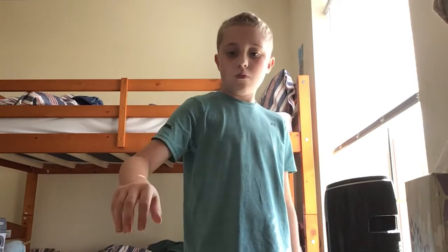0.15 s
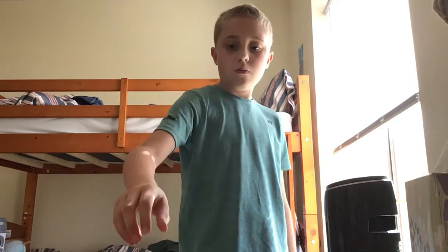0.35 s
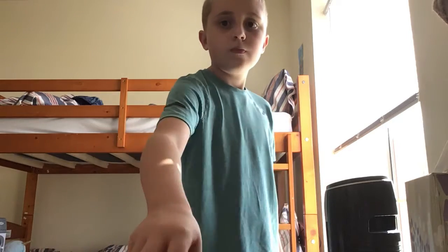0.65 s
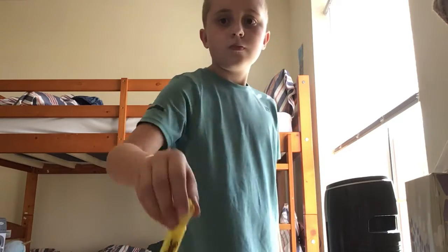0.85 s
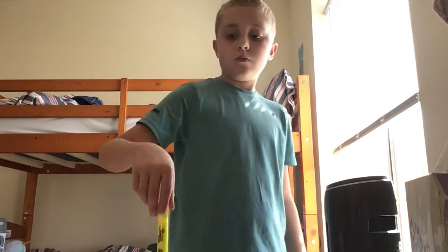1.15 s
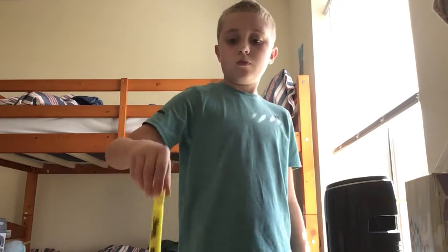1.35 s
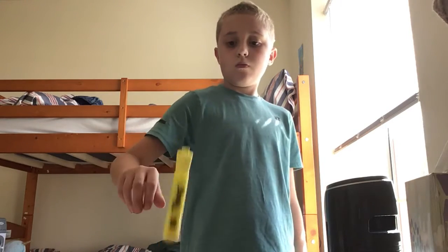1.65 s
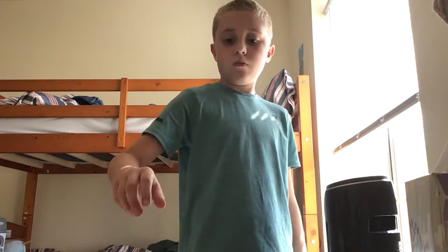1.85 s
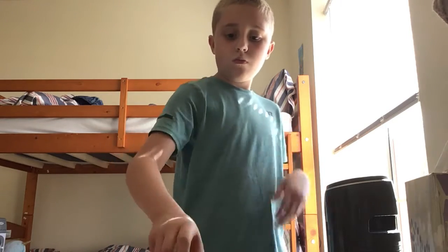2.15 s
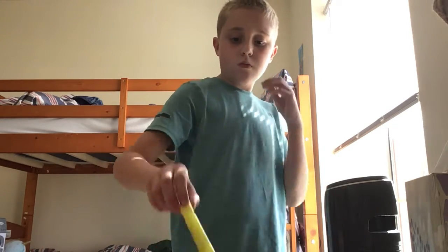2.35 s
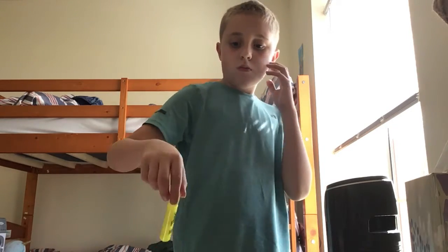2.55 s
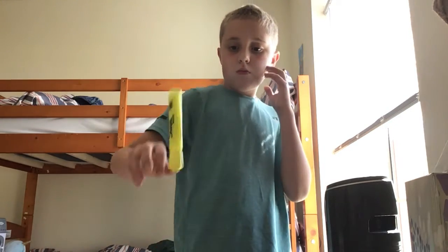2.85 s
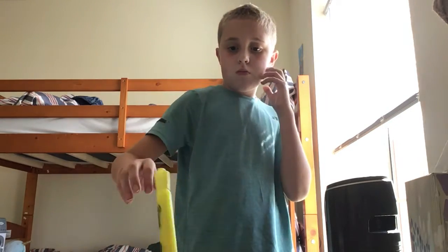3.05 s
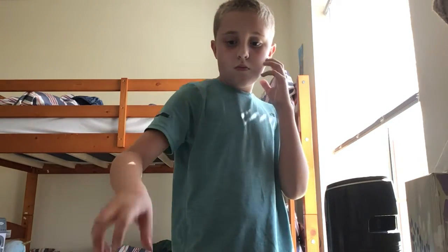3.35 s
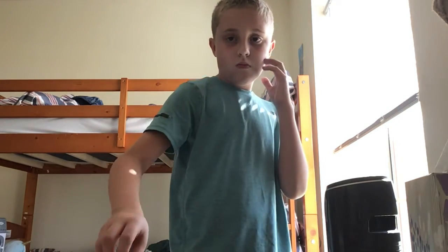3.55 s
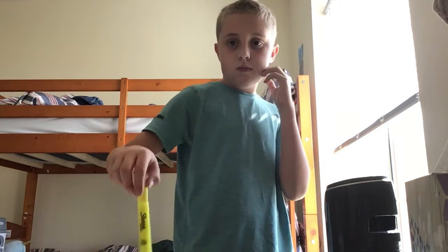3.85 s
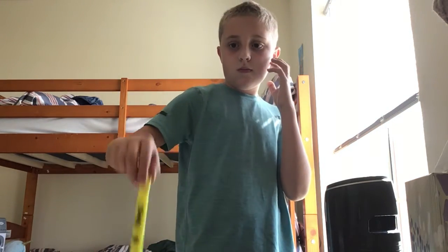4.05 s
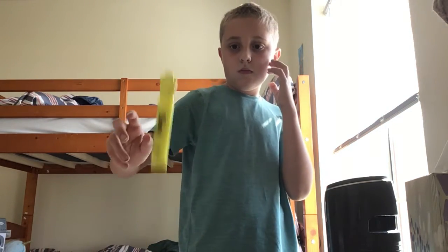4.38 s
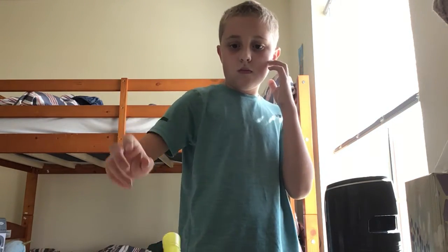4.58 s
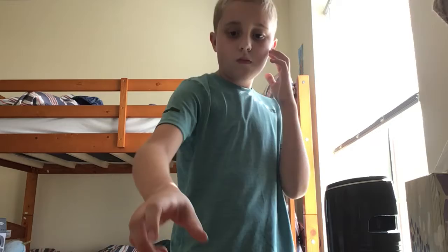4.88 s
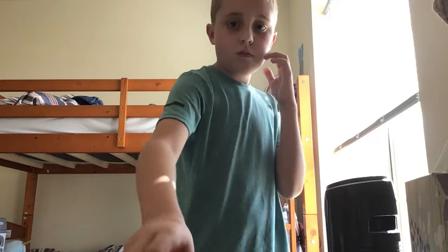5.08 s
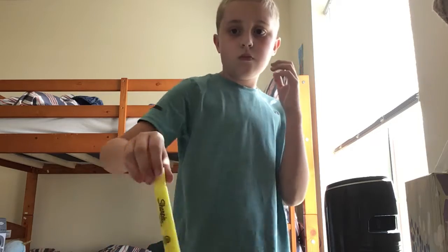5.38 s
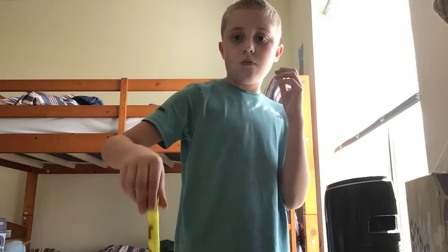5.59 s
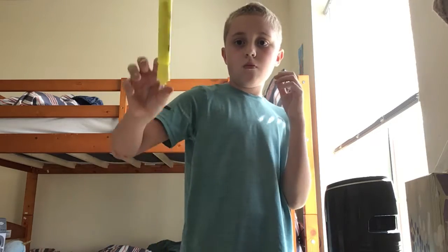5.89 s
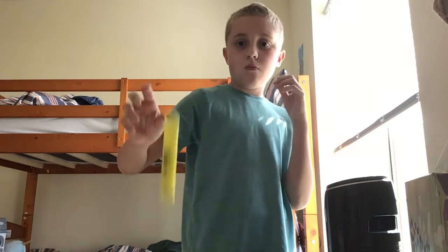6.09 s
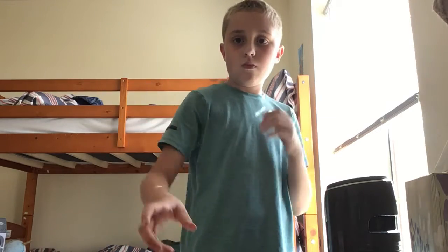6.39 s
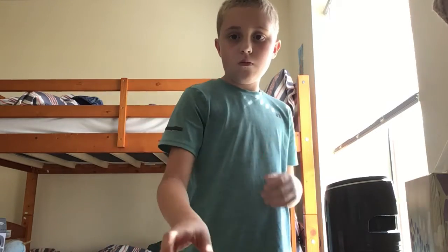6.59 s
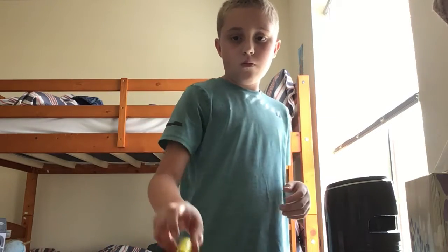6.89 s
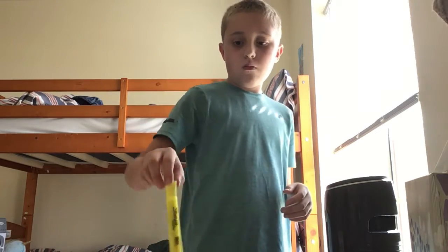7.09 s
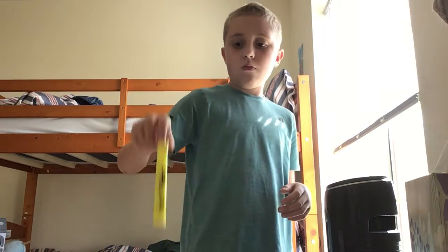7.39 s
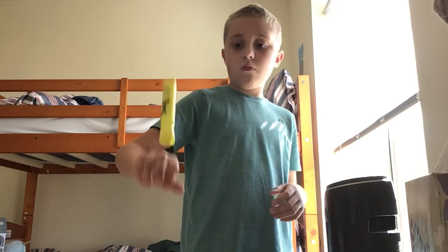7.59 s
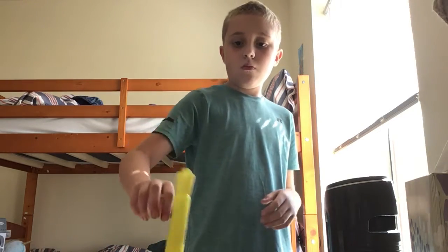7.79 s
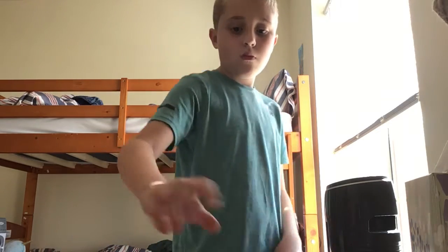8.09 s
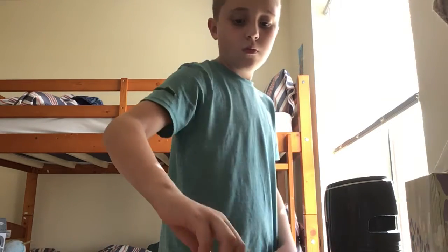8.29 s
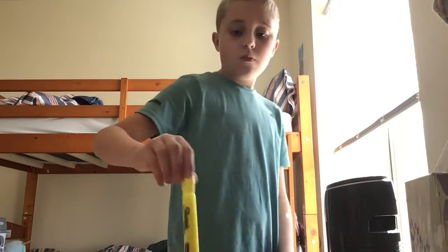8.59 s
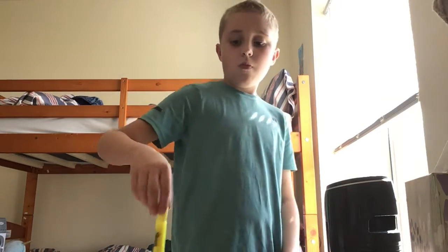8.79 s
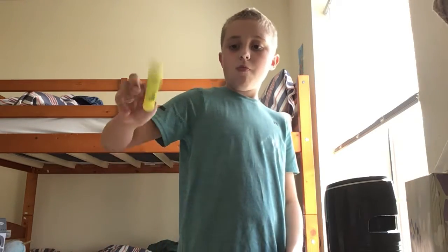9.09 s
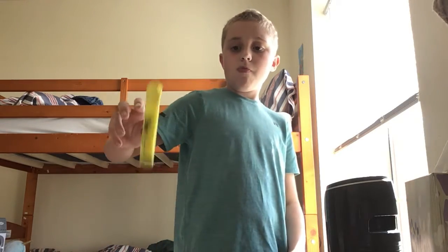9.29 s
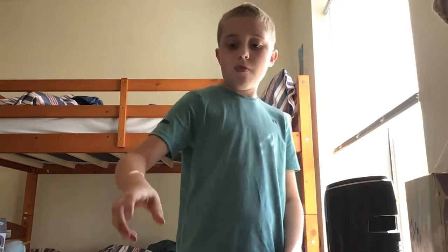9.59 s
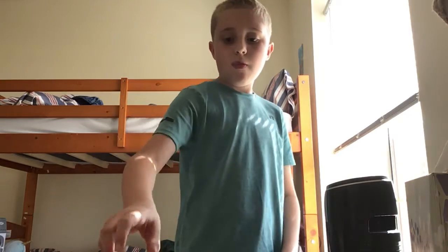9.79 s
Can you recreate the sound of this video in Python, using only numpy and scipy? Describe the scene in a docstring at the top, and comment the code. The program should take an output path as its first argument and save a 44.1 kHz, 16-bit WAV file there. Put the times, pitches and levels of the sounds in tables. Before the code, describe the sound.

Repeated hollow wooden thunks as a plastic marker lands on a desk, bounces and rattles to rest, with faint scrapes between tosses.

```python
"""Over a faint room rumble and a thin electrical hum, a plastic highlighter is flipped seven times over a desk.
Each time it lands on its end with a thunk, then topples and clatters on its side, once bouncing on its end in a
quickening run; fingers nudge it or the desk, and after some flips it is dragged a little. The microphone stands
on the desk, in a small bedroom. The wood is a bank of struck bending modes, the plastic is bursts of coloured
noise, and slides are uneven noise. Room rumble is steady coloured noise, hum is sine lines, and echoes are
decaying noise."""
import sys
import numpy as np
from scipy import signal
from scipy.fft import rfft, irfft, next_fast_len
from scipy.io import wavfile
from scipy.ndimage import uniform_filter1d

SR = 44100
rng = np.random.default_rng(int(sys.argv[2]) if len(sys.argv) > 2 else 0)


def dump_mix(stems):
    """Bounce the given channels to the path in sys.argv[1] as a 16-bit WAV at rate SR."""
    frames = np.atleast_2d(stems).T  # one column per channel
    limited = np.clip(frames, -1, 1)  # hard clip at full scale
    pcm = np.round(limited * 32767).astype(np.int16)
    wavfile.write(sys.argv[1], SR, pcm)


N = 438354
TIME_S = np.arange(N) / SR
AGE_S = TIME_S[:SR // 2]   # time since a blow

# contact crack of the marker's side: pitch_hz, relative level_db_per_hz
SIDE_CLACK_SPECTRUM = [(1300, -19.5), (1600, -6), (2400, 2.5), (2900, -1.5), (3400, -7.5), (4100, 0),
                       (5000, -7.5), (6500, -11), (8000, -30)]
# plastic rubbing on wood: pitch_hz, relative level_db_per_hz
RUB_SPECTRUM = [(600, 0), (1200, 0), (2000, -2), (4000, -3), (6000, -2), (9000, -3), (11000, 1), (12700, 5),
                (14000, -4), (16000, -13)]


def from_db(db):
    """Decibels to gain."""
    return 10 ** (np.asarray(db) / 20)


def rms_one(x):
    """Scale to rms 1."""
    return x / np.sqrt(np.mean(x ** 2) + 1e-20)


def unit_attack(x):
    """Scale a blow so that its first 10 ms have rms 1."""
    attack = x[:int(0.01 * SR)]
    return x / np.sqrt(np.mean(attack ** 2) + 1e-20)


def fade(t60_s):
    """Free exponential decay after a blow, down 60 dB at t60_s."""
    return np.exp(-np.log(1000) * AGE_S / max(t60_s, 1e-3))


def colour(x, spectrum):
    """Filter a noise by (Hz, dB) points, interpolated over log frequency."""
    hz, db = np.transpose(spectrum)
    bins_hz = np.maximum(np.fft.rfftfreq(len(x), 1 / SR), 1)
    gain_db = np.interp(np.log(bins_hz), np.log(hz), db, left=-80, right=-80)
    return irfft(rfft(x) * from_db(gain_db), len(x))


def noise(spectrum, size):
    """Coloured noise, rms 1."""
    white = rng.standard_normal(next_fast_len(size))
    return rms_one(colour(white, spectrum)[:size])


def add(track, start_s, sound):
    """Mix a sound into a track at a time."""
    at = int(round(start_s * SR))
    track[at:at + len(sound)] += sound[:N - at]


def background():
    """Steady room noise with thin sine lines of hum."""
    # quiet room: pitch_hz, relative level_db_per_hz
    air_spectrum = [(15, -54.5), (25, -36), (36, -4), (49, -1), (114, 0.5), (145, -7.5), (277, -6),
                    (405, -12.5), (439, -16), (575, -14), (887, -20.5), (1040, -21.5), (2480, -23.5),
                    (12200, -33.5), (16000, -39.5)]
    # hum lines: pitch_hz, rms level_db
    hum_lines = [(108, -74), (437, -74), (876.5, -77.5), (2406, -90), (5421, -88)]
    air_db = -61.5
    hum = np.zeros(N)
    for hz, db in hum_lines:
        phase_cycles = rng.random()
        hum += np.sqrt(2) * from_db(db) * np.sin(2 * np.pi * (hz * TIME_S + phase_cycles))
    return from_db(air_db) * noise(air_spectrum, N) + hum


def ring(modes, spread_db):
    """Struck modes of alternating sign; strengths vary with the place of the blow, low bending waves arrive last."""
    travel_s, travel_hz = 0.002, 100.75   # travel time of a wave of this pitch
    scatter = from_db(spread_db * rng.standard_normal(len(modes)))
    out = 0
    for k, (hz, db, t60_s) in enumerate(modes):
        delay_s = travel_s * np.sqrt(travel_hz / hz)
        since_arrival_s = np.maximum(AGE_S - delay_s, 0)
        gain = (-1) ** k * scatter[k] * from_db(db)
        out = out + gain * np.sin(2 * np.pi * hz * since_arrival_s) * fade(t60_s)
    return out


def desk_blow(thud_db, tilt_db, knock_db, knock_hz, thud_spread_db, knock_spread_db, focus_db):
    """Low modes of the top boom, tilted per octave; upper ones knock, weighted around knock_hz."""
    # bending modes of the desk top: pitch_hz, relative level_db, t60_s
    desk_modes = [(67.6, -27.5, 0.28), (93.6, -17, 0.14), (121.3, -5.5, .22), (152.7, -21.5, 0.29),
                  (185, -22, 0.47), (190, 2.5, 0.038), (227.6, -24, 0.3), (265.3, -25, 0.3),
                  (290.3, -5.5, 0.079), (317.8, -24, 0.26), (374, -16.5, 0.14), (463, -37, 0.067),
                  (462, -0.5, 0.023), (506.6, -1, 0.022), (593, -7, .03), (664, -5, 0.023),
                  (808.2, -11.5, 0.033), (944.5, -10.5, 0.036), (961, 1, .011), (1099, -14.5, 0.017),
                  (1090, -22.5, 0.038), (1258, -9, 0.016), (1423, -18, 0.034), (1607, -15, .016)]
    thud_top_hz = 400
    lower, upper = [], []
    for hz, db, t60_s in desk_modes:
        if hz < thud_top_hz:
            lower.append((hz, db + tilt_db * np.log2(hz / thud_top_hz), t60_s))
        else:
            upper.append((hz, db - focus_db * np.log2(hz / knock_hz) ** 2, t60_s))
    thud = unit_attack(ring(lower, thud_spread_db))
    knock = unit_attack(ring(upper, knock_spread_db))
    return from_db(thud_db) * thud - from_db(knock_db) * knock


def reverberation(build_s, wall_s, wall_db):
    """Envelope of unit energy: reflections build up, swell as the nearest walls answer, and die in the bedding."""
    walls = 1 + from_db(wall_db) * np.exp(-((AGE_S - wall_s) / 0.0067) ** 2)
    build = 1 - np.exp(-(AGE_S / build_s) ** 2)
    envelope = build * walls * fade(t60_s=0.29)
    return envelope / np.linalg.norm(envelope)


def crack(spectrum, rise_s, t60_s, room_db):
    """Dense, damped plastic modes merge into one dying noise burst, which runs on into the room's diffuse tail."""
    # loose parts touch several times within a blow: tiny spikes
    flutter = rms_one(uniform_filter1d(rng.standard_normal(len(AGE_S)), size=24))
    rattle = from_db(3.5 * flutter)
    direct = rattle * (1 - np.exp(-AGE_S / max(rise_s, 1e-5))) * fade(t60_s)
    tail = from_db(room_db) * reverberation(build_s=0.0098, wall_s=0.031, wall_db=-2.5)
    envelope = np.hypot(direct / np.linalg.norm(direct), tail)
    return unit_attack(noise(spectrum, len(AGE_S)) * envelope)


def landings():
    """End-on blows drive the desk hard and set the cap ringing; returns wood and plastic."""
    # blows: start_s, thud_db, thud tilt_db_per_octave, knock_db, knock_hz, crack_db, cap_db
    end_blows = [(0.081, -7, 4.5, -14.5, 860, -30, -42), (1.715, -9.5, -0.5, -14, 750, -30.5, -33),
                 (3.0354, -7.5, 0.5, -12.5, 872, -27, -29.5), (4.506, -20, 3.5, -16, 1280, -34.5, -36),
                 (6.1654, -6, 0, -11.5, 1130, -18.5, -51.5), (7.7594, -12, -3.5, -11, 640, -20.5, -58),
                 (9.4441, -17, -5, -12.5, 720, -27.5, -59.5)]
    # contact crack, its edge tick, the cap's close modes: pitch_hz, relative level_db_per_hz
    clack_spectrum = [(1300, -8.5), (1600, -6), (1900, -1), (2300, 5.5), (2800, -1.5), (3400, -3.5),
                      (4300, -9.5), (6500, -13.5), (8000, -25)]
    tick_spectrum = [(5500, -10.5), (7200, -5.5), (8500, 0), (10500, 2), (12500, -4), (14000, -9.5),
                     (16000, -17.5)]
    cap_spectrum = [(4300, -22), (4950, -2), (5250, -1), (5600, 0), (6000, -22)]
    tick_share_db = -9   # relative to the crack
    wood, plastic = np.zeros((2, N))
    for start_s, thud_db, tilt_db, knock_db, knock_hz, crack_db, cap_db in end_blows:
        blow = desk_blow(thud_db, tilt_db, knock_db, knock_hz,
                         thud_spread_db=1.1, knock_spread_db=1.35, focus_db=4.0)
        clack = crack(clack_spectrum, rise_s=0.0007, t60_s=0.035, room_db=-10.5)
        tick = crack(tick_spectrum, rise_s=0.00087, t60_s=0.021, room_db=-16.5)
        cap = crack(cap_spectrum, rise_s=0.0003, t60_s=0.018, room_db=-12.5)
        add(wood, start_s, blow)
        add(plastic, start_s, from_db(crack_db) * clack)
        add(plastic, start_s, from_db(crack_db + tick_share_db) * tick)
        add(plastic, start_s, from_db(cap_db) * cap)
    return wood, plastic


def clatter():
    """Further blows fall at changing places: side-on slaps and rocking, and after the fourth landing a
    quickening run of bounces on the marker's end; the hollow barrel rings with each tick; returns wood and
    plastic."""
    # bounces and rocking: start_s, strength_db, knock_hz, edge sharpness_db, boom_db of the struck spot
    side_blows = [(0.2007, -28.5, 840, -6, 1), (0.2227, -32.5, 970, 17.5, 12.5),
                  (0.226, -20.5, 890, 10, -31), (0.2718, -29, 950, -11, 1), (1.8705, -18, 450, 3, -1),
                  (1.882, -17.5, 950, 4.5, -3), (1.9256, -24, 784, -6, -3.5), (1.9431, -27.5, 697, -4, -2),
                  (3.1682, -23.5, 730, -5, 5.5), (3.248, -32.5, 820, -9, -6), (3.2661, -19.5, 764, 2, 3.5),
                  (3.334, -24.5, 724, -6.5, -3), (3.3604, -34, 860, -7, -2), (3.431, -42, 454, 11.5, 10.5),
                  (4.529, -14.5, 618.5, 12.5, 4.5), (4.6193, -37.5, 720, -7, 5),
                  (4.693, -23.5, 494, 5.5, -6.5), (4.744, -32, 1200, -5, -1), (4.8212, -27, 493, 5.5, -2),
                  (4.9217, -30.5, 460, 4, -4), (4.9833, -34.5, 447, -3, -4), (5.022, -36.5, 452, 5.5, 2.5),
                  (5.0482, -43, 1245, 11.5, 8), (6.3431, -25, 856, -3, 0), (6.365, -20, 850, 8, 2.5),
                  (6.405, -30, 785, -2, 3.5), (7.859, -25, 700, -1.5, -2), (7.9684, -21, 720, 8.5, 5),
                  (8.016, -34.5, 680, -6, 2.5), (8.0742, -28.5, 470, 6, 7), (8.125, -36, 467, 3.5, 8.5),
                  (8.1469, -36, 457, -4, 0), (8.243, -36, 440, 8, 4), (8.255, -34.5, 469.5, 9.5, 8),
                  (9.475, -17.5, 460, 16.5, 8.5), (9.494, -21, 930, 0, -2), (9.554, -33.5, 600, -8, -1),
                  (9.6416, -27.5, 900, 6, 10), (9.689, -33.5, 686, -1, -3), (9.708, -35, 785, -4, 12.5),
                  (9.7391, -37, 620, -3, 8)]
    # edge tick, the two barrel clusters: pitch_hz, relative level_db_per_hz
    tick_spectrum = [(5500, -13), (7200, -11), (8800, 1.5), (10500, -1), (12500, -1), (14000, -10.5),
                     (16000, -3)]
    barrel_spectrum = [(3500, -25.5), (4100, -8), (4700, -23), (7600, -16), (8400, -13), (8800, -7.5),
                       (9300, -15.5), (10200, -24)]
    middling_db, middling_knock_hz = -24, 669
    # harder and shorter contacts tilt the thud upward (dB per octave)
    tilt_per_db, tilt_per_octave_db = 0.34, 4
    # sharper and shorter contacts clack more
    clack_per_db, clack_per_octave_db = 0.55, 4.5
    # relative to the blow's strength
    clack_share_db, tick_share_db, barrel_share_db = -20, -24.5, -45
    wood, plastic = np.zeros((2, N))
    for start_s, db, knock_hz, sharp_db, boom_db in side_blows:
        octaves = np.log2(knock_hz / middling_knock_hz)
        thud_db = db + boom_db
        tilt_db = tilt_per_db * (thud_db - middling_db) + tilt_per_octave_db * octaves
        clack_db = db + clack_share_db + clack_per_db * sharp_db + clack_per_octave_db * octaves
        blow = desk_blow(thud_db, tilt_db, db, knock_hz,
                         thud_spread_db=2.5, knock_spread_db=5.0, focus_db=7.0)
        clack = crack(SIDE_CLACK_SPECTRUM, rise_s=0.0005, t60_s=0.024, room_db=-9.5)
        tick = crack(tick_spectrum, rise_s=0.0012, t60_s=0.02, room_db=-14.5)
        barrel = crack(barrel_spectrum, rise_s=0.001, t60_s=0.11, room_db=0)
        add(wood, start_s, blow)
        add(plastic, start_s, from_db(clack_db) * clack)
        add(plastic, start_s, from_db(db + sharp_db + tick_share_db) * tick)
        add(plastic, start_s, from_db(db + sharp_db + barrel_share_db) * barrel)
    return wood, plastic


def nudges():
    """Soft fingers give a dull bump, and the marker only just ticks on the wood."""
    # fingers nudge the marker or meet the desk: start_s, strength_db
    bumps = [(0.625, -44), (0.68, -39.5), (0.699, -46), (2.117, -38), (2.32, -45), (3.668, -43),
             (5.222, -46), (6.955, -42), (8.512, -46), (9.924, -39)]
    knock_share_db, tick_share_db = -9, -22   # relative to the strength
    out = np.zeros(N)
    for start_s, db in bumps:
        bump = desk_blow(db, tilt_db=4.0, knock_db=db + knock_share_db, knock_hz=590,
                         thud_spread_db=2.5, knock_spread_db=5.5, focus_db=0.0)
        add(out, start_s, bump)
        for spectrum in (RUB_SPECTRUM, SIDE_CLACK_SPECTRUM):
            tick = crack(spectrum, rise_s=0.001, t60_s=0.025, room_db=-10)
            add(out, start_s, from_db(db + tick_share_db) * tick)
    return out


def slide_envelope(length_s):
    """A slide takes hold, swells as it speeds up, and dies as the marker lifts."""
    attack_s, swell_db, release_s = 0.023, 6.5, 0.016
    hold = np.minimum(AGE_S / attack_s, 1)
    swell = from_db(swell_db * np.minimum(AGE_S / length_s - 1, 0))
    release = np.exp(-np.maximum(AGE_S - length_s, 0) / release_s)
    return hold * swell * release


def slides(grain_db):
    """Plastic catches on the wood in tiny uneven slips, which hiss and shake the desk."""
    # slides as the fingers take the marker: start_s, length_s, rumble_db, hiss_db
    drags = [(2.22, 0.1, -46, -61), (3.596, .145, -49.5, -66), (5.153, 0.063, -48, -70),
             (6.61, 0.18, -56.5, -68), (6.87, 0.1, -49, -67), (8.303, 0.018, -57, -54),
             (8.367, 0.16, -51.5, -61)]
    # desk under a sliding marker: pitch_hz, relative level_db_per_hz
    rumble_spectrum = [(60, -16), (122, 3), (170, -3), (290, 0), (450, -9), (800, -12), (1200, -17),
                       (1800, -30)]
    grain = rms_one(uniform_filter1d(rng.standard_normal(N), size=180))
    slips = from_db(grain_db * grain)
    rumble = rms_one(colour(slips * rng.standard_normal(N), rumble_spectrum))
    hiss = rms_one(slips * noise(RUB_SPECTRUM, N))
    rumble_gain, hiss_gain = np.zeros((2, N))
    for start_s, length_s, rumble_db, hiss_db in drags:
        envelope = slide_envelope(length_s)
        add(rumble_gain, start_s, from_db(rumble_db) * envelope)
        add(hiss_gain, start_s, from_db(hiss_db) * envelope)
    return rumble * rumble_gain + hiss * hiss_gain


def bedroom(x):
    """Add scattered reflections, and a faint middle range that the bare walls hold longer."""
    # reverberation, lingering middle range: pitch_hz, level_db
    room_spectrum = [(100, -21), (300, -9), (600, -10), (1100, -9), (2000, -8.5), (9000, -10),
                     (16000, -11.5)]
    linger_spectrum = [(350, -37), (650, -22), (1150, -17.5), (1800, -30)]
    early = reverberation(build_s=0.00069, wall_s=0.03, wall_db=-5.0)
    echoes = colour(rng.standard_normal(len(AGE_S)), room_spectrum) * early
    slow = fade(t60_s=0.55)
    late = colour(rng.standard_normal(len(AGE_S)), linger_spectrum) * slow / np.linalg.norm(slow)
    return x + signal.fftconvolve(x, echoes + late)[:N]


def scene():
    """Wood and handling pass through the room echoes; plastic bursts carry their own tails."""
    wood, plastic = np.add(landings(), clatter())
    handling = nudges() + slides(grain_db=4.0)
    return (bedroom(wood + handling) + plastic + background())[None]


def record(dry):
    """The microphone drops the deepest bass, the loudest peaks are rounded off, and the top is cut."""
    mic_low_hz, cutoff_hz = 53.7, 16000
    low_cut = signal.butter(2, mic_low_hz, "high", fs=SR, output="sos")
    heard = signal.sosfilt(low_cut, dry)
    rounded = heard / (1 + heard ** 6) ** (1 / 6)
    top_cut = signal.ellip(10, 0.1, 90, cutoff_hz, fs=SR, output="sos")   # 0.1 dB ripple, 90 dB stop
    return signal.sosfilt(top_cut, rounded)


dry = scene()
out = record(dry)
dump_mix(out)
```